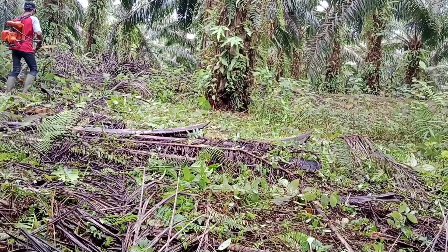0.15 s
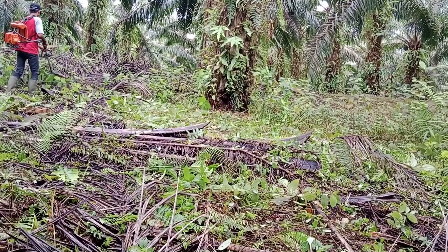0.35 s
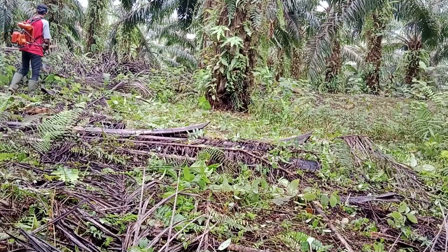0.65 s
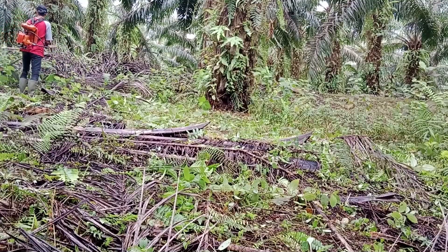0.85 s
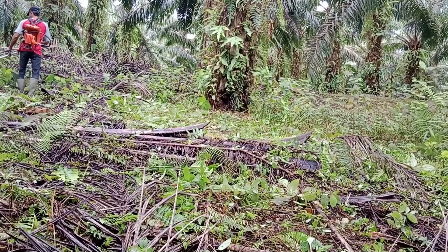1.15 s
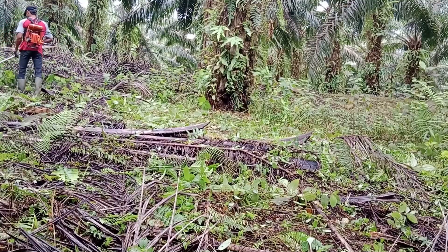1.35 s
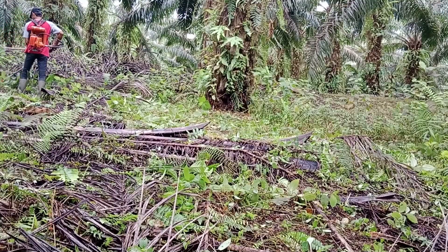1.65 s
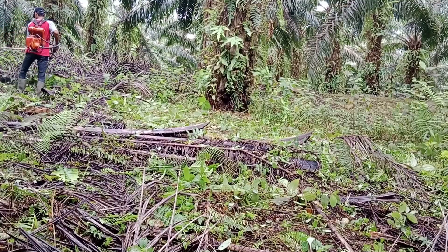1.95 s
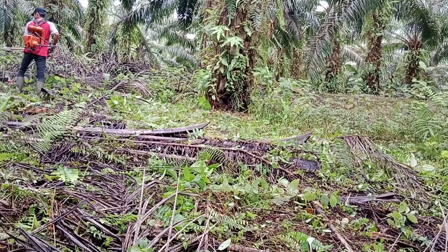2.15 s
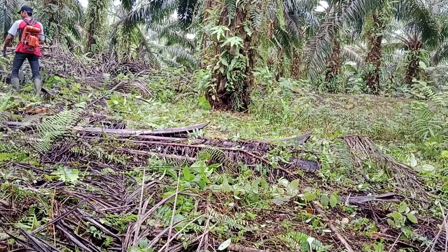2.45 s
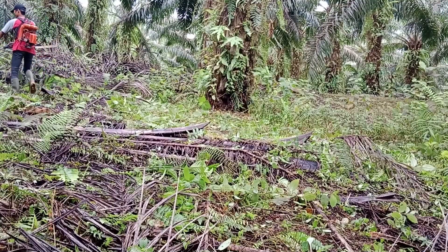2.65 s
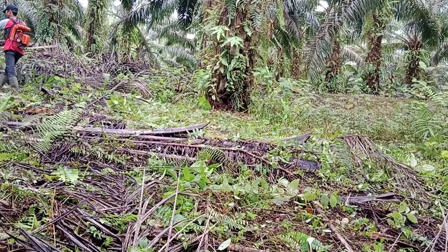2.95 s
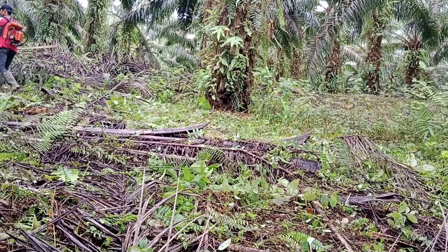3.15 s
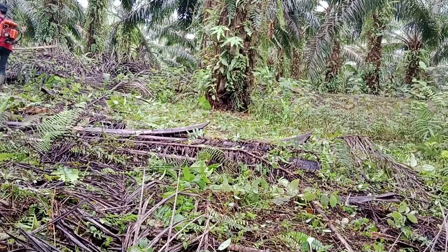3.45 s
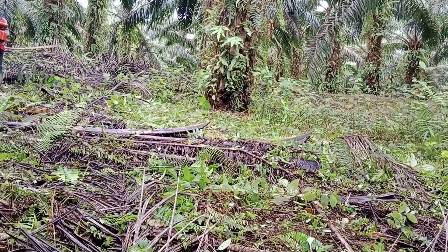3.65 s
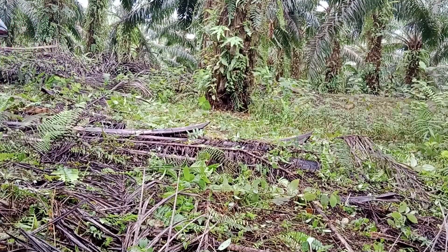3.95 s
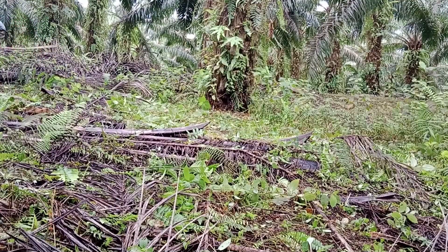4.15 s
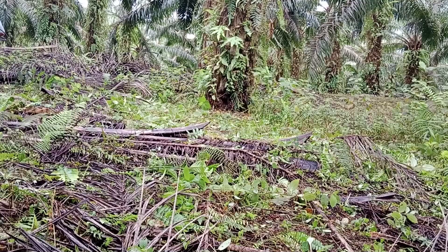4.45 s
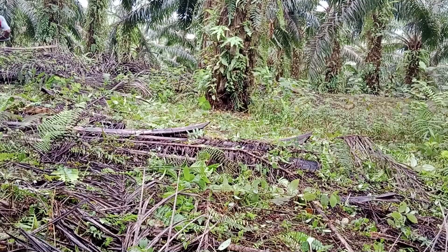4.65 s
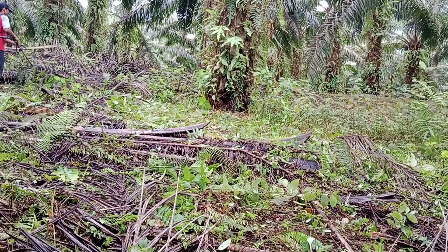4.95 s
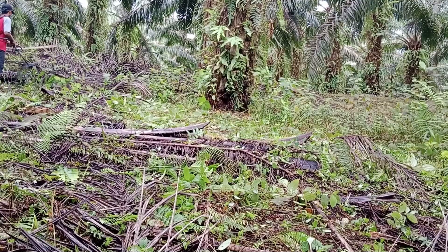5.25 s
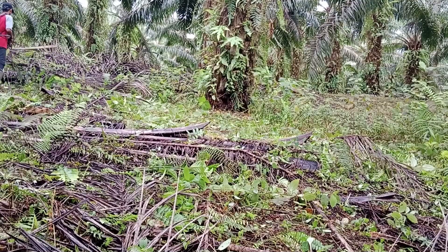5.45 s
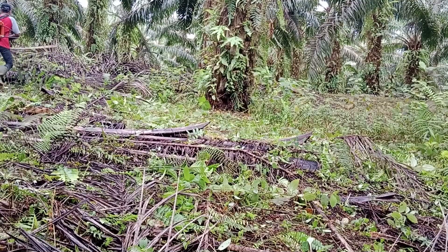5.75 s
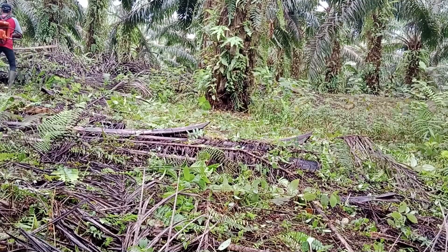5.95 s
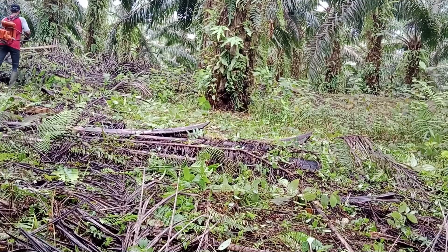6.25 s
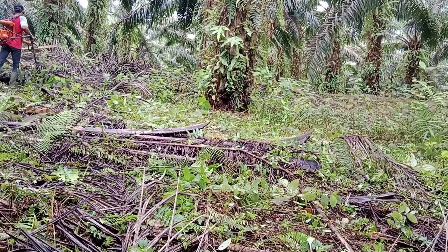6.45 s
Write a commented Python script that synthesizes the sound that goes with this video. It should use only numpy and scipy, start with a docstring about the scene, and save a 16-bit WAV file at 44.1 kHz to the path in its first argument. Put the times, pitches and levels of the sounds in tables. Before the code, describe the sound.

A small two-stroke brush cutter wavers in speed while its blade hisses and crackles through undergrowth, with light wind on the microphone.

```python
"""Brush cutter among palms

A small two-stroke works some metres away, hunting around 87 firings a second. Exhaust pops
ring in the muffler and the housing buzzes. The blade swishes through grass, thrashes and snaps
stems, and its blows ring in the shaft. Ground and trunks echo; light wind rumbles on the microphone."""
import sys
import numpy as np
from scipy import signal
from scipy.fft import rfft, irfft
from scipy.io import wavfile

SR = 44100
rng = np.random.default_rng(int(sys.argv[2]) if len(sys.argv) > 2 else 0)


def transcribe(u):
    """Save the signal u as a 16-bit wav file named by the first command-line argument.

    u: samples, shape (n,) or (channels, n), limited to [-1, 1]; the rate is SR.
    q: integer samples, one column per channel.
    """
    v = np.clip(np.atleast_2d(u).T, -1, 1)
    q = np.round(v * 32767).astype(np.int16)
    wavfile.write(sys.argv[1], SR, q)


N = 291060


def from_db(db):
    return 10 ** (np.asarray(db) / 20)


def rms_one(x):
    return x / np.sqrt(np.mean(x ** 2) + 1e-20)


def in_time(rows):
    """Rows of (time [s], values...) to one per-sample curve per value column."""
    times_s, *columns = np.transpose(rows)
    return [np.interp(np.arange(N) / SR, times_s, column) for column in columns]


def drift(rate_hz):
    """Slow random wander: noise through two one-pole low-passes; rms 1."""
    r = np.exp(-2 * np.pi * rate_hz / SR)
    return rms_one(signal.lfilter([1], [1, -2 * r, r * r], rng.standard_normal(N + SR)))[SR:]


def resonate(x, modes):
    """Parallel modes (frequency [Hz], width [Hz], gain [dB]), signs alternating; rms 1."""
    out = 0
    for k, (hz, width_hz, gain_db) in enumerate(modes):
        r = np.exp(-np.pi * width_hz / SR)
        b = [(1 - r * r) / 2, 0, (r * r - 1) / 2]
        a = [1, -2 * r * np.cos(2 * np.pi * hz / SR), r * r]
        out = out + (-1) ** k * from_db(gain_db) * signal.lfilter(b, a, x)
    return rms_one(out)


def colour(x, spectrum):
    """Minimum-phase filter through the points (frequency [Hz], gain [dB])."""
    hz, gain_db = np.transpose(spectrum)
    grid_hz = np.maximum(np.arange(2049) * SR / 4096, 1)
    cepstrum = irfft(np.log(from_db(np.interp(np.log(grid_hz), np.log(hz), gain_db))))
    cepstrum[1:2048] *= 2
    cepstrum[2049:] = 0
    return signal.fftconvolve(x, irfft(np.exp(rfft(cepstrum))))[:N]


def grains(per_s, spread_db, bursts_per_s, burst_gain, fade_s):
    """Random clicks of uneven size; each tuft hit starts a fading burst; rms 1."""
    sizes = from_db(spread_db * np.minimum(rng.exponential(1, N), 4)) * rng.standard_normal(N)
    hits = (rng.random(N) < bursts_per_s / SR) * burst_gain * np.minimum(rng.exponential(1, N), 2.5)
    bursts = 1 + signal.lfilter([1], [1, -np.exp(-1 / (fade_s * SR))], hits + 1e-18)
    return rms_one(sizes * (rng.random(N) < per_s / SR) * bursts)


def wind():
    """Lumpy rumble of air on the microphone, with a higher flutter at its port."""
    # wind strength: (time [s], rumble [dB], flutter [dB])
    levels = [(0.0, -68.5, -80), (0.68, -74, -82), (1.43, -68, -58.5), (1.67, -56.5, -66),
              (1.91, -71.5, -79.5), (2.37, -73.5, -78.5), (3.14, -57.5, -65), (3.31, -62.5, -77.5),
              (3.47, -48.5, -71), (3.66, -67.5, -73.5), (3.86, -53.5, -64), (5.09, -67.5, -63),
              (5.27, -73.5, -74.5), (6.43, -59.5, -61), (6.6, -69, -66)]
    # rumble spectrum: (frequency [Hz], gain [dB])
    rumble_spectrum = [(25, -14), (50, -10), (100, 2.5), (150, -0.5), (220, -11), (400, -36.5)]
    # port resonance: (frequency [Hz], width [Hz], gain [dB])
    port_mode = (233, 75, 0)
    rumble_db, flutter_db = in_time(levels)
    rumble = rms_one(colour(rng.standard_normal(N), rumble_spectrum))
    flutter = resonate(resonate(rng.standard_normal(N), [port_mode]), [port_mode])
    lumps = from_db(2.2 * drift(rate_hz=18))
    return lumps * (from_db(rumble_db) * rumble + from_db(flutter_db) * flutter)


def echoes(x):
    """Reflections only; leaves and soft ground absorb their treble."""
    # ground, then trunks: (delay [s], gain [dB])
    paths = [(.0013, -9), (.021, -18), (.047, -20)]
    dull = signal.lfilter([.3], [1, -.7], x)
    out = np.zeros(N)
    for delay_s, gain_db in paths:
        lag = round(delay_s * SR)
        out[lag:] += from_db(gain_db) * dull[:N - lag]
    return out


def hollow(x):
    """The sound briefly hollows out in a narrow band."""
    # passing notches: (mid time [s], length [s], centre [Hz], depth [0-1])
    notches = [(.75, 0.61, 700, .95), (2.244, 0.67, 660, 0.9), (5.123, 0.19, 680, 0.4)]
    t, out = np.arange(N) / SR, x
    for mid_s, length_s, hz, depth in notches:
        window = np.cos(np.pi * np.clip((t - mid_s) / length_s, -.5, .5)) ** 2
        band = signal.lfilter(*signal.iirpeak(hz, Q=3.0, fs=SR), x)
        out = out - depth * window * band
    return out


def engine():
    """One uneven pop and puff per turn ring the muffler and shake loose housing parts."""
    # hunting under changing load: (time [s], firing rate [1/s])
    speed = [(0, 80.5), (.18, 83.4), (.36, 82.3), (.49, 86.1), (.67, 84), (.91, 87.8), (1.1, 86),
             (1.4, 88.5), (1.6, 85.4), (1.86, 86.2), (2.0, 81), (2.29, 81.5), (2.5, 85.5), (2.58, 83),
             (2.79, 88.2), (2.96, 87.3), (3.1, 90.5), (3.31, 88.6), (3.46, 92.6), (3.62, 88.7), (3.79, 94),
             (3.97, 86.6), (4.19, 93.1), (4.37, 85.7), (4.64, 92.6), (4.75, 87.7), (4.98, 92.4),
             (5.11, 84.6), (5.26, 90.8), (5.4, 87.4), (5.57, 91), (6.3, 88.7), (6.43, 90.3), (6.6, 85.5)]
    # outlet aim as the worker sways: (time [s], middle mode [dB], upper mode [dB], firing tone [dB])
    levels = [(0.0, -65, -54.5, -67), (0.8, -61, -53, -63), (1.05, -55, -53, -60.5), (1.3, -54, -50, -59),
              (1.7, -52, -51, -60), (2.11, -63.5, -54.5, -67), (2.5, -60, -54.5, -66),
              (2.81, -55.5, -55, -57), (3.34, -55, -56, -59), (4.5, -52, -51, -60.5), (4.82, -55, -48, -63),
              (5.0, -56, -52, -59), (5.13, -62, -57, -71), (5.85, -58, -54.5, -66.5),
              (6.23, -54, -48.5, -61), (6.47, -57, -48.5, -61), (6.6, -56, -58, -70)]
    # low, middle, upper muffler mode: (frequency [Hz], width [Hz], delay [s], puff share [ratio])
    muffler_modes = [(525, 110, 0, .4), (650, 190, .002, .4), (825, 230, .0035, .3)]
    # housing resonances: (frequency [Hz], width [Hz], gain [dB])
    housing_modes = [(2247, 71, -5.5), (2616, 100, -9.5)]
    t = np.arange(N) / SR
    middle_db, upper_db, tone_db = in_time(levels)
    low_db = -52.5 - 0.76 * t   # heard all round; fades as the worker walks off
    buzz_db = -51.5 + 0.21 * (upper_db - upper_db.mean())
    firing_hz = in_time(speed)[0] * (1 + .016 * drift(rate_hz=30))
    turns = np.cumsum(firing_hz) / SR
    strength = from_db(1.3 * rng.standard_normal(1000))[turns.astype(int)]
    puff = rms_one(np.exp(-2.5 * (turns % 1)) * rng.standard_normal(N))
    pops = rms_one(strength * (np.diff(np.floor(turns), prepend=0) > 0))
    exhaust = 0
    for (hz, width_hz, delay_s, share), level_db in zip(muffler_modes, (low_db, middle_db, upper_db)):
        drive = np.roll(pops + share * puff, round(delay_s * SR))
        mode = [(hz, width_hz, 0)]
        exhaust = exhaust + from_db(level_db) * resonate(resonate(drive, mode), mode)
    outlet = signal.butter(8, 475, "high", fs=SR, output="sos")   # too small to radiate bass
    exhaust = signal.sosfilt(outlet, exhaust)
    tone = np.sqrt(2) * np.sin(2 * np.pi * turns + 1.8 * drift(rate_hz=4))
    shake = (0.28 * pops + puff) * from_db(1.0 * drift(rate_hz=3.4))
    buzz = resonate(shake, housing_modes)
    return exhaust + from_db(tone_db) * tone + from_db(buzz_db) * buzz


def snaps(spectrum):
    """Stems break: sharp cracks with a splintering tail of a few ms."""
    # breaking stems: (time [s], strength [dB])
    breaks = [(0.059, -29.5), (0.397, -23.5), (1.037, -28), (1.344, -29), (1.8856, -32.5), (2.0078, -26),
              (2.6944, -26), (2.794, -24.5), (2.957, -25), (3.063, -18.5), (3.0824, -19), (3.0912, -20),
              (3.1288, -21), (4.0941, -27), (4.1696, -24), (4.7377, -25), (4.781, -17.5), (5.2087, -28),
              (5.9288, -21), (6.359, -24)]
    clicks, tail_s = np.zeros(N), .0012
    for time_s, strength_db in breaks:
        clicks[round(time_s * SR)] = from_db(strength_db)
    envelope = signal.lfilter([1], [1, -np.exp(-1 / (tail_s * SR))], clicks + 1e-18)
    return colour(envelope * rng.standard_normal(N), spectrum)


def cut_levels_db():
    """Swish, thrash and ring levels: each cut rises and fades over the skimming."""
    # skimming thin grass between cuts: (time [s], swish [dB])
    skim = [(0, -47.5), (.3, -45), (.95, -46.5), (2.1, -50.5), (2.33, -50), (2.6, -44.5), (3.3, -44.5),
            (4.05, -44.5), (5.2, -43.5), (5.4, -51), (5.85, -44.5), (6.6, -46.5)]
    # cuts into growth: (start [s], rise [s], 10 dB fade [s], swish [dB], thrash [dB], ring [dB])
    cuts = [(.1, 0.14, 0.05, -35, -48.5, -53), (.39, .015, .12, -41, -56, -53),
            (1.034, .04, .15, -37, -39, -36), (1.08, .12, 0.1, -31.5, -35, -41),
            (1.34, 0.043, 0.24, -30, -38.5, -45.5), (1.57, 0.063, 0.06, -33.5, -42, -50),
            (1.7, 0.066, 0.0859, -29.5, -38, -39), (1.88, 0.0091, 0.11, -31, -41, -48),
            (2.0, 0.038, 0.1061, -30.5, -41, -47), (2.58, 0.099, 0.06, -37.5, -43.5, -44),
            (2.75, 0.051, 0.05, -37, -42.5, -49), (2.95, 0.039, .15, -33, -43, -51.5),
            (3.01, .11, 0.0443, -31.5, -44, -52), (3.671, 0.11, .07, -31.5, -42.5, -46),
            (4.085, 0.028, 0.08, -38.5, -48, -58), (4.16, .06, .11, -32, -40, -40),
            (4.728, 0.043, 0.11, -35.5, -47, -49), (4.88, 0.11, 0.02, -35.5, -45, -53),
            (5.918, 0.044, 0.07, -29.5, -40, -42), (6.07, .04, .08, -42, -50, -53),
            (6.29, .05, .08, -40, -50, -53), (6.352, .02, .11, -32.5, -47.5, -48)]
    t, (skim_db,) = np.arange(N) / SR, in_time(skim)
    swing_db = 0.48 * (skim_db - skim_db.mean())
    power = from_db([skim_db, -50 + swing_db, -53.5 + swing_db]) ** 2
    for start_s, rise_s, fade_s, *levels_db in cuts:
        rise = np.clip((t - start_s) / rise_s, 0, 1) ** 0.6   # bites at once, then swells
        fade = from_db(-10 * np.maximum(t - start_s - rise_s, 0) / fade_s)
        power += (from_db(levels_db)[:, None] * rise * fade) ** 2
    return 10 * np.log10(power)


def blade(swish_spectrum):
    """Air hiss off the blade turns to brighter crackle as it bites; blows on stems ring the shaft."""
    # thrashed stems: (frequency [Hz], gain [dB])
    thrash_spectrum = [(450, -21.5), (750, -7), (1000, -13.5), (1600, -1.5), (2500, -1), (3600, 0.5),
                       (7000, -28.5)]
    # shaft resonances: (frequency [Hz], width [Hz], gain [dB])
    shaft_modes = [(1099, 71, 1), (1167, 39, 4), (1276, 190, -7)]
    swish_db, thrash_db, ring_db = cut_levels_db()
    bite = np.clip((swish_db + 48) / 20, 0, .85)
    hiss = signal.lfilter([1, .3], [1], rng.standard_normal(N)) * from_db(1.25 * drift(rate_hz=73))
    crackle = grains(per_s=20000, spread_db=-0.5, bursts_per_s=76, burst_gain=0.78, fade_s=0.0016)
    swish = rms_one(colour(np.sqrt(1 - bite) * hiss + np.sqrt(bite) * crackle, swish_spectrum))
    blows = grains(per_s=10000, spread_db=1.0, bursts_per_s=54, burst_gain=0.19, fade_s=0.0078)
    thrash = rms_one(colour(blows, thrash_spectrum))
    ring = resonate(resonate(blows, shaft_modes), [(1158, 1400, 0)])
    return from_db(swish_db) * swish + from_db(thrash_db) * thrash + from_db(ring_db) * ring


def scene():
    """Cutter, its echoes and wind; mono."""
    # spectrum of grass swish and stem snaps: (frequency [Hz], gain [dB])
    cutting_spectrum = [(1500, -22.5), (2500, -13), (4000, 4), (7300, 5), (10500, -3), (13000, -11),
                        (16000, -13.5)]
    cutter = hollow(engine() + blade(cutting_spectrum)) + snaps(cutting_spectrum)
    return (cutter + echoes(cutter) + wind())[None]


def record(dry):
    """Comb-like dips hollow the treble, deepest near 4.8 kHz; a steep low-pass removes the top."""
    # treble dips: (centre [Hz], width [Hz], gain [dB])
    dips = [(5070, 3330, -12.5), (4746, 480, -35.5), (9200, 600, -4), (11500, 830, -3), (13900, 1700, -9)]
    stopband_hz = 15620
    for hz, width_hz, gain_db in dips:
        amp, w = from_db(gain_db / 2), 2 * np.pi * hz / SR
        alpha = np.sin(w) * width_hz / hz / 2
        b = [1 + alpha * amp, -2 * np.cos(w), 1 - alpha * amp]
        a = [1 + alpha / amp, -2 * np.cos(w), 1 - alpha / amp]
        dry = signal.lfilter(b, a, dry)
    return signal.sosfilt(signal.cheby2(30, 60, stopband_hz, fs=SR, output="sos"), dry)


dry = scene()
out = record(dry)
transcribe(out)
```